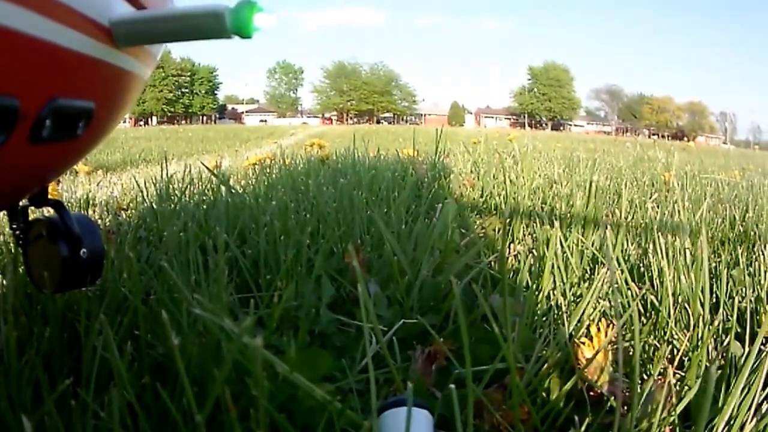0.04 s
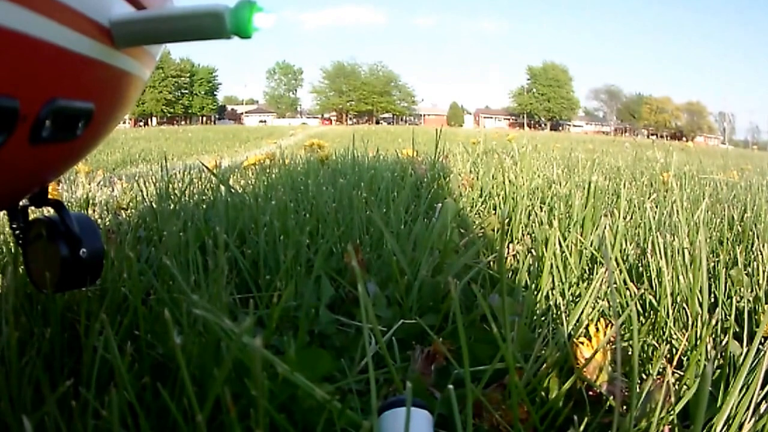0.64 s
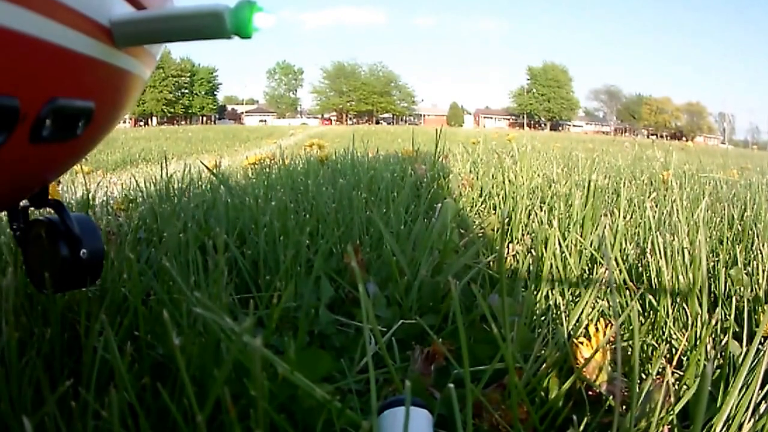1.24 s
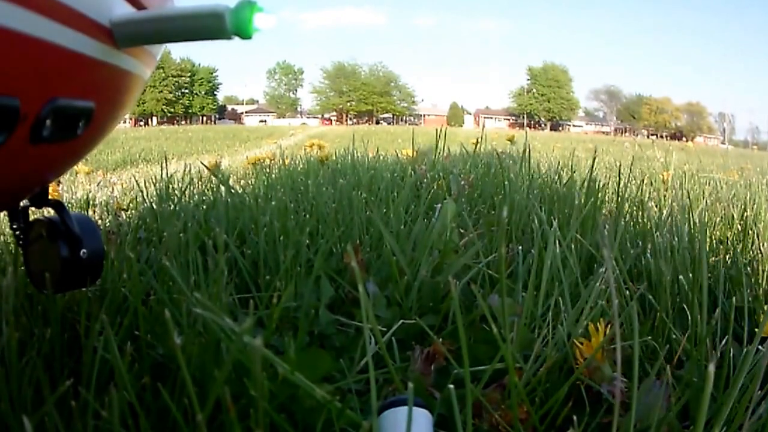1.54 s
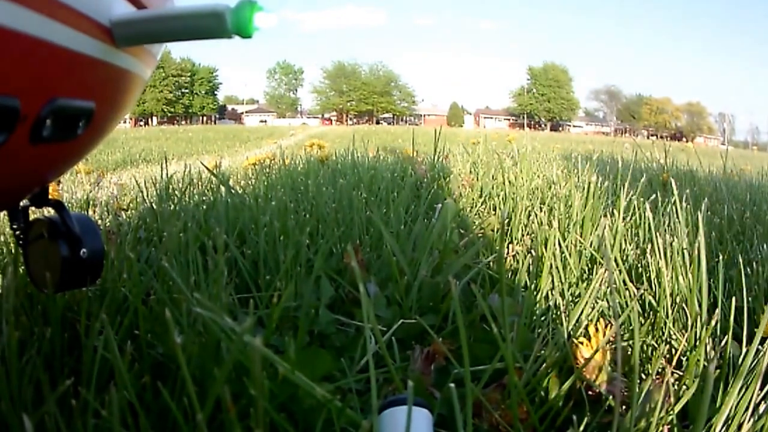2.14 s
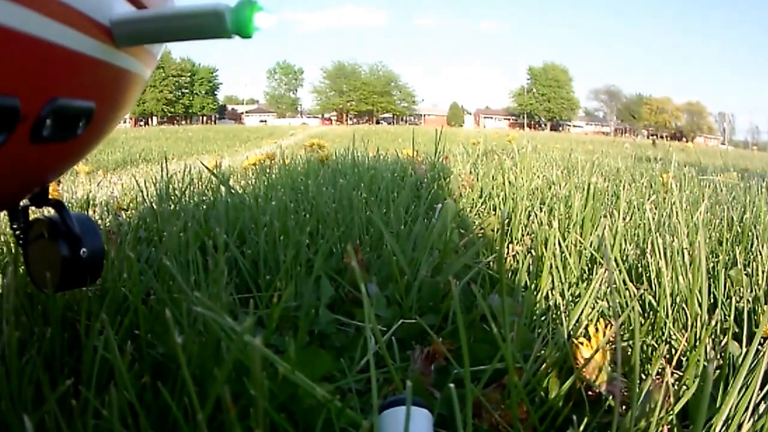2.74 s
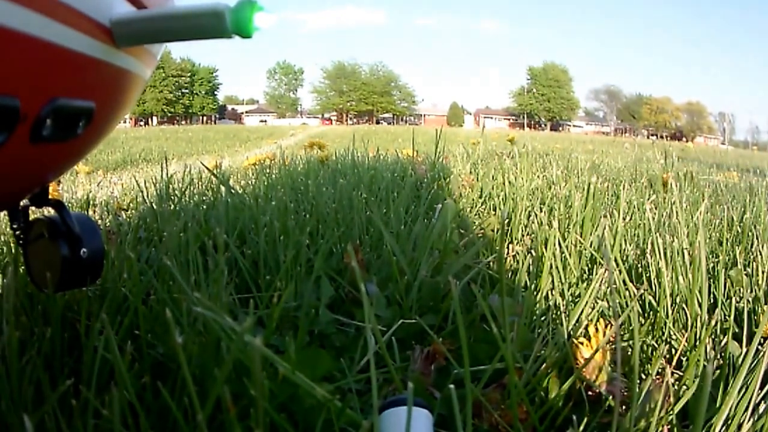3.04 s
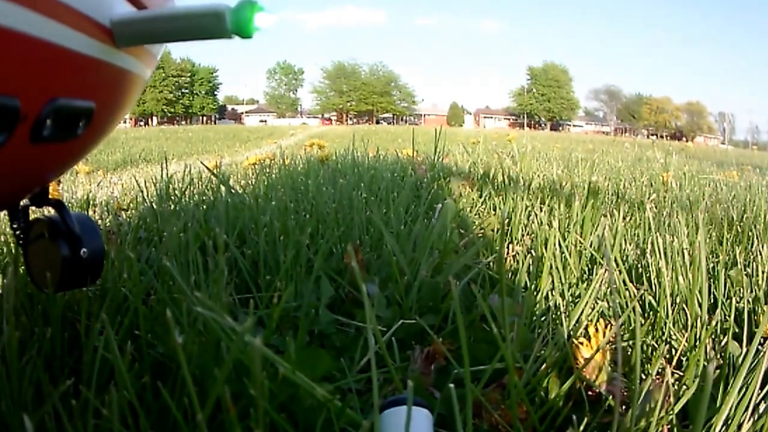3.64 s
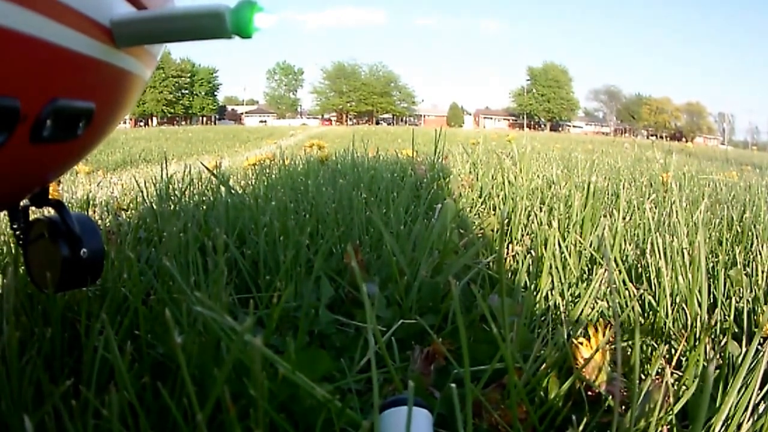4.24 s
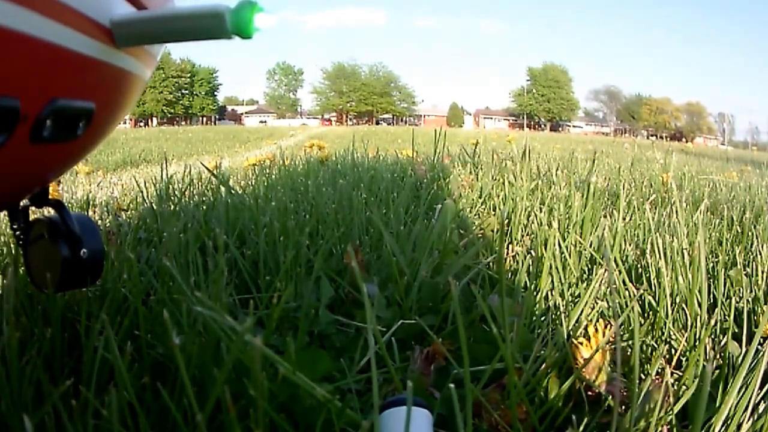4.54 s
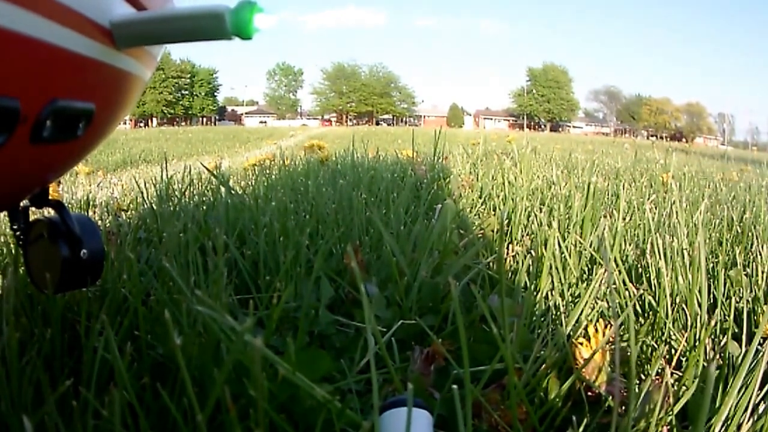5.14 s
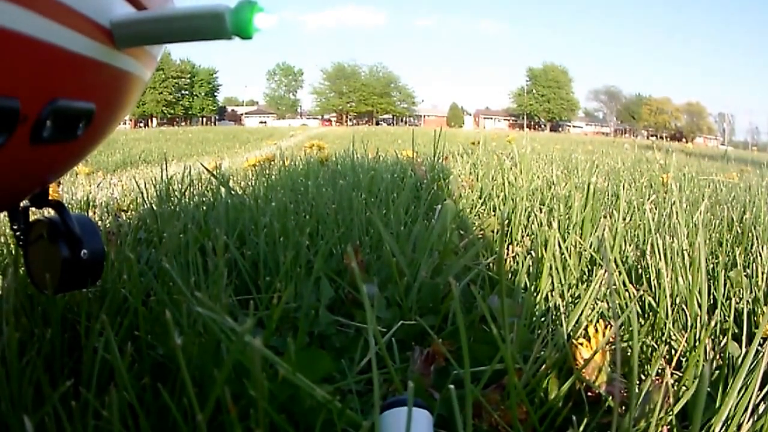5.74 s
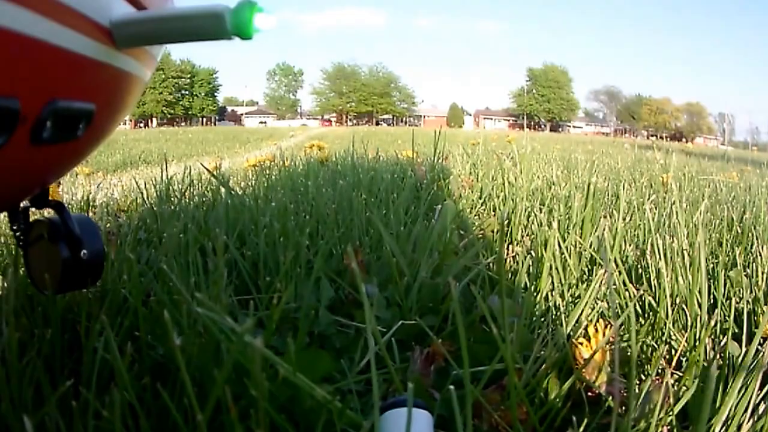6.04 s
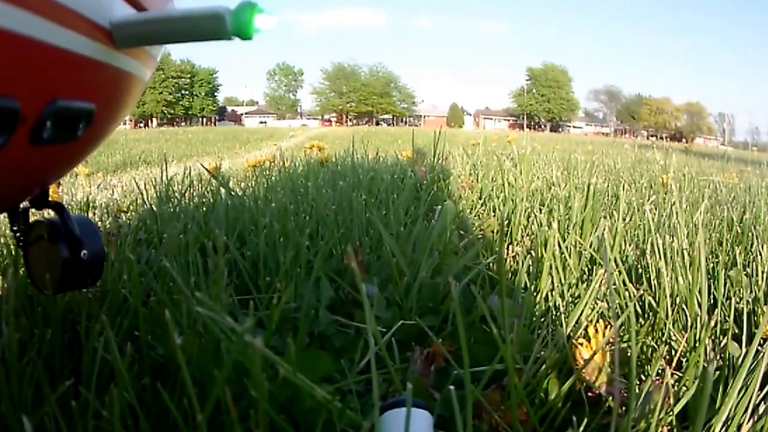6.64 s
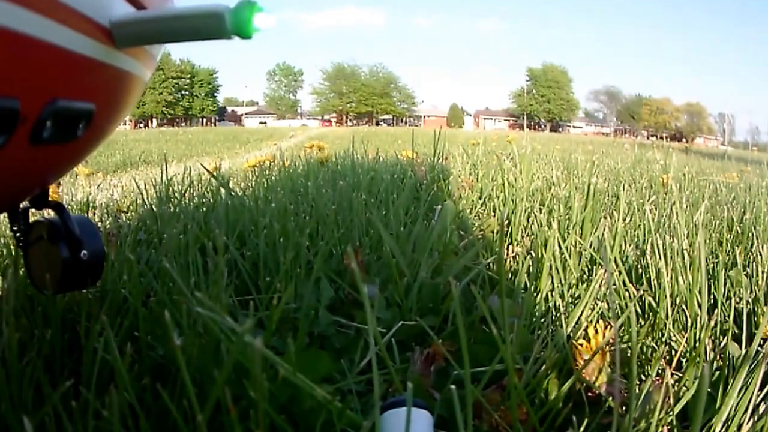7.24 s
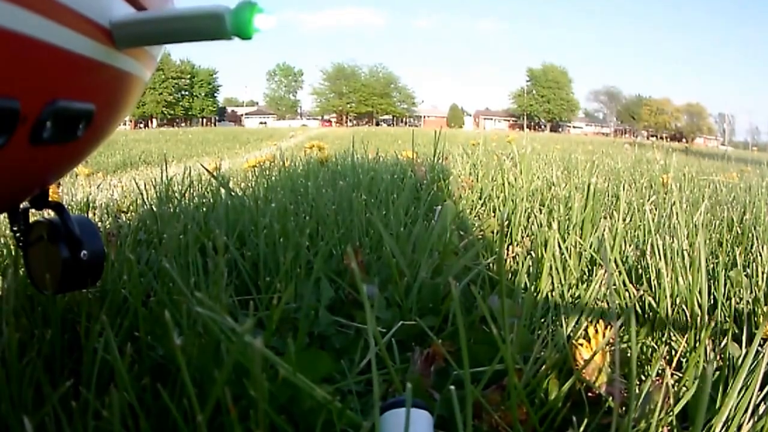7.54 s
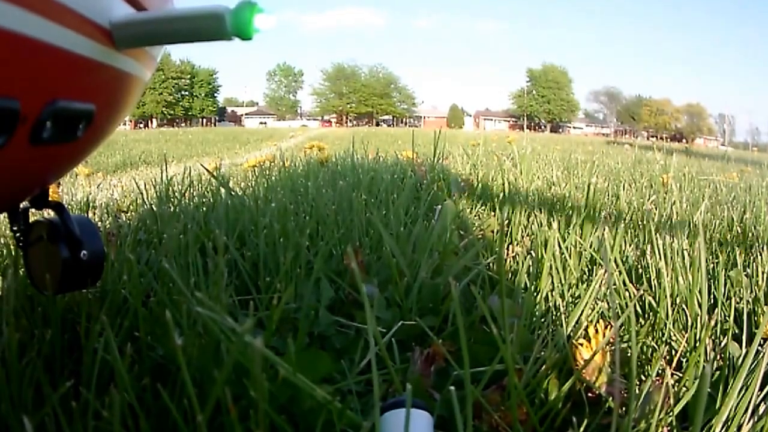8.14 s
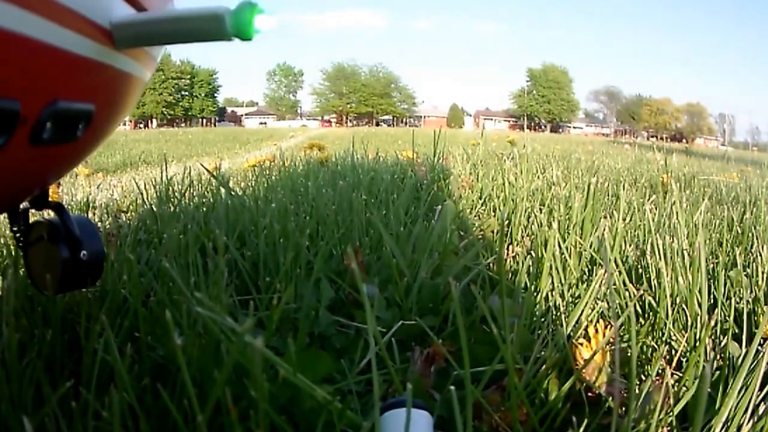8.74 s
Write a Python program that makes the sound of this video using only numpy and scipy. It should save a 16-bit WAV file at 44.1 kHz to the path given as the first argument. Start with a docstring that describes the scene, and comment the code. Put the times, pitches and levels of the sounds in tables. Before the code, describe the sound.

A model turbine helicopter winds down on the ground in an open field, heard from very close. A thin, high whine glides downward over a hissing jet, rushing exhaust and humming gears, with several brief dips early on. About halfway, a louder, piercing whistle breaks in and wavers as the engine settles to idle. The slowing blades give everything a fast flutter, and the exhaust swells again near the end.

```python
"""Model turbine helicopter winding down

A model helicopter stands in a grassy field while its engine slows to idle and its rotor coasts.
The compressor's whine glides down and echoes off the passing blades, the gears hum, the flame roars
and the jet hisses. The exhaust swells with the gas flow, and everything sags together in short lulls.
A small camera on the landing gear hears nothing above 9.6 kHz, so the whine's octave breaks in late."""
import sys
import numpy as np
from scipy.fft import rfft, irfft
from scipy.io import wavfile
from scipy.ndimage import uniform_filter1d

SR = 44100
rng = np.random.default_rng(int(sys.argv[2]) if len(sys.argv) > 2 else 0)


def master(y):
    """Save y as 16-bit WAV."""
    cut = np.clip(np.atleast_2d(y).T, -1, 1)
    pcm = np.round(cut * 32767)  # scale
    wavfile.write(sys.argv[1], SR, pcm.astype(np.int16))


N = 396900  # 9 seconds


def from_db(db):
    """Turn decibels into a gain to multiply by."""
    return 10 ** (np.asarray(db) / 20)


def rms_one(x):
    """Scale a signal to an average strength (rms) of 1."""
    return x / np.sqrt(np.mean(x ** 2) + 1e-20)


def in_time(rows):
    """Join (time, value) points with straight lines, giving one value per sample."""
    return np.interp(np.arange(N) / SR, *np.transpose(rows))


def angle(per_s):
    """The angle reached by something that makes this many turns a second."""
    return 2 * np.pi * np.cumsum(per_s) / SR


def tone(phase, level_db):
    """A pure tone at the given rms level."""
    return np.sqrt(2) * from_db(level_db) * np.sin(phase)


def drift(rate_hz):
    """A smooth random wobble of rms 1, mostly slower than the given rate."""
    hz = np.arange(N // 2 + 1) * SR / N
    return rms_one(irfft(rfft(rng.standard_normal(N)) / (1 + (hz / rate_hz) ** 2), N))


def turbulence(colour, flutter_db, flutter_hz):
    """Coloured noise of rms 1 whose strength flutters as swirls of gas pass."""
    hz, db = np.transpose(colour)
    bins = np.maximum(np.arange(N // 2 + 1) * SR / N, 1)
    gain = from_db(np.interp(np.log(bins), np.log(hz), db))
    noise = irfft(rfft(rng.standard_normal(N)) * gain, N)
    return rms_one(noise * from_db(flutter_db * drift(flutter_hz)))


def bump(middle_s, length_s, steepness=2.23):
    """A rounded bump in time: 1 at its middle, 0 far from it."""
    distance = np.abs(2 * (np.arange(N) / SR - middle_s) / length_s)
    return np.exp(-np.minimum(distance, 4) ** steepness)


def engine_state(speed, idle_hz=925, load_octaves=0.36):
    """How hard the engine works: gas flow in dB, load (near 0 at idle, 1 at most) and lulls in dB."""
    # strength of the gas flow: (time [s], level over quiet idle [dB])
    flow = [(0, 6.5), (.3, 6), (1.0, 9.5), (1.5, 7), (1.8, 6.5), (2.3, 2.5), (2.8, -1.7), (3.1, -1.5),
            (3.9, -2), (4.3, -0.5), (5.5, -1.5), (6.2, 1), (6.7, 6.5), (8.15, 6), (8.7, 1.5)]
    # the engine's sound sags briefly: (middle [s], length [s], depth [dB])
    lulls = [(0.474, 0.066, 6), (0.577, 0.078, 5.5), (0.662, 0.25, 8.5), (1.165, 0.16, 3),
             (1.357, 0.11, 7.5), (2.137, 0.38, 9), (2.412, 0.16, 3), (2.53, 0.35, 6.5), (3.103, 0.27, 1.5),
             (3.697, 0.47, 1.5), (7.08, 0.44, 4), (7.637, 0.27, 2.5)]
    load = np.tanh(np.log2(speed / idle_hz) / load_octaves)
    lull_db = sum(depth_db * bump(s, length) for s, length, depth_db in lulls)
    return in_time(flow), load, lull_db


def follow(state, idle_db, flow_share, load_db, lull_share):
    """The level in dB of a sound that follows the engine's flow and load and sinks in the lulls."""
    flow_db, load, lull_db = state
    return idle_db + flow_share * flow_db + load_db * load - lull_share * lull_db


def chopping(blade):
    """Each passing blade chops the sound below it twice; gives the rise and fall in dB."""
    # chop depth, greatest at quiet idle: (time [s], swing at the blade rate [dB])
    depth = [(0, .5), (1.03, .5), (1.15, 1.6), (1.3, .8), (1.6, .5), (3.0, .5), (3.25, 1.4), (4.5, 1.35),
             (5.2, 1.8), (5.6, .8), (6.5, .35), (8.0, .35), (9, .7)]
    return in_time(depth) * (.8 * np.cos(2 * blade) - np.cos(blade))


def gas_flow(state, blade):
    """The flame roars, the exhaust rushes, the jet hisses and rasps; all sputter and flare together."""
    # colours of the four noises: (frequency [Hz], relative level [dB])
    roar_colour = [(15, -79), (40, -64.5), (70, -23), (120, -18), (155, -19), (190, -4.5), (250, -4),
                   (290, -5.5), (380, -1.5), (500, 0.5), (570, -3), (680, -8), (1000, -12.5), (2000, -41)]
    rush_colour = [(400, -27), (750, -11.5), (1000, -10.5), (1250, -3), (1570, -0.9), (1900, -3.5),
                   (2200, -7), (2600, -17), (4000, -23.5)]
    hiss_colour = [(1500, -25), (2500, -11), (3030, -3.5), (3350, -6), (4150, -2.5), (4450, -3.5),
                   (5150, -0.5), (5400, -1), (5730, -0.5), (6250, -1), (6680, 0.5), (7130, -0.4),
                   (7450, 0.5), (7750, 0), (8430, 3), (8950, 0.5), (9550, 5), (9900, -23.5)]
    rasp_colour = [(1700, -22.5), (2400, 0), (2900, -3.5), (3800, -1.5), (4800, -3.5), (6500, -16.5)]
    # the flame flares for an instant: (middle [s], length [s], rise [dB])
    flares = [(0.288, 0.083, 4.5), (0.526, 0.022, 4), (0.745, 0.045, 4.5), (1.055, 0.096, 0.5),
              (1.266, 0.042, 2), (1.793, .1, 0.5), (2.306, 0.024, 6.5), (2.784, 0.067, 5), (2.89, 0.083, 2),
              (3.316, .2, 1), (5.967, 0.15, 2), (7.35, 0.24, 1), (8.307, 0.3, 0.5)]
    sputter, chop_db = drift(58), chopping(blade)
    flare_db = sum(rise_db * bump(s, length) for s, length, rise_db in flares)
    flare_db += 0.5 * drift(12)  # the flame also flickers gently all the time
    roar_db = follow(state, idle_db=-38.5, flow_share=.5, load_db=7, lull_share=0.97)
    rush_db = follow(state, idle_db=-36.5, flow_share=1, load_db=-2, lull_share=1.05)
    hiss_db = follow(state, idle_db=-28.5, flow_share=0.9477, load_db=-5.5, lull_share=0.93)
    rasp_db = follow(state, idle_db=-52.5, flow_share=0, load_db=18.5, lull_share=1.3)
    roar = from_db(roar_db + 0.96 * sputter) * turbulence(roar_colour, flutter_db=0.7, flutter_hz=5.7)
    rush = from_db(rush_db + 0.98 * sputter) * turbulence(rush_colour, flutter_db=0.97, flutter_hz=250)
    hiss = from_db(hiss_db) * turbulence(hiss_colour, flutter_db=0.71, flutter_hz=70)
    rasp = from_db(rasp_db) * turbulence(rasp_colour, flutter_db=0.5, flutter_hz=86)
    jet_swing_db = 0.25 * sputter + .65 * chop_db + 0.34 * flare_db
    return from_db(chop_db + flare_db) * (roar + rush) + from_db(jet_swing_db) * (hiss + rasp)


def compressor(state, shaft, speed, blade, vanes=5, echo_delay_s=.00296):
    """Spinning vanes whine; their tone and its octave beat against echoes off the moving blades."""
    # the whine swells and fades as it glides: (time [s], level [dB])
    whine = [(0, -30.5), (.65, -32), (.88, -30.5), (1.1, -39.5), (1.27, -31.5), (1.52, -32.5),
             (1.68, -39.5), (1.85, -33), (2.25, -31.5), (2.45, -40), (2.85, -31.5), (3.1, -35), (3.42, -31),
             (3.85, -35), (4.05, -32), (4.4, -38), (5.17, -32), (5.75, -38), (6.05, -43), (6.8, -40),
             (7.4, -42), (9, -42.5)]
    # its octave, from main and splitter vanes together: (time [s], level [dB])
    octave = [(4.232, -41), (4.25, -15), (4.33, -14.5), (4.4, -19), (5.55, -20.5), (5.62, -15.5),
              (6.05, -15), (6.6, -20), (7.0, -18), (7.42, -19), (7.58, -16), (7.8, -19.5), (8.7, -17)]
    # the octave cuts out for an instant: (time [s], depth [dB])
    dropouts = [(4.355, 18), (4.445, 12), (4.515, 20), (4.585, 31), (5.575, 10)]
    _, _, lull_db = state
    whine_db = in_time(whine) - 1.25 * lull_db
    octave_db = in_time(octave) - sum(depth_db * bump(s, length_s=0.022) for s, depth_db in dropouts)
    # one echo comes from the blade's root and one from its tip; each pass sweeps their delays
    root_db = follow(state, idle_db=-17.5, flow_share=1.95, load_db=-12, lull_share=1.7)
    root_db = np.maximum(root_db, -15)
    sweep = np.sin(blade + 0.16 * drift(19))
    root_lag = 2 * np.pi * (speed * echo_delay_s - .024 * sweep)
    tip_lag = 2 * np.pi * (speed * echo_delay_s - .058 * sweep)
    tip_gain = from_db(-17 + 2.4 * drift(30)) * (1 + 0.87 * np.cos(blade))  # strongest as the tip nears
    out = 0
    for multiple, level_db in ((vanes, whine_db), (2 * vanes, octave_db)):
        root_echo = from_db(root_db + drift(20)) * np.exp(-1j * multiple * root_lag)
        tip_echo = tip_gain * np.exp(-1j * multiple * tip_lag)
        paths = 1 + root_echo + tip_echo  # the 1 is the direct sound
        beating = np.abs(paths) / np.sqrt(uniform_filter1d(np.abs(paths) ** 2, size=SR // 10))
        out += beating * tone(multiple * shaft + np.angle(paths), level_db + 0.86 * drift(31))
    return out


def gears(state, shaft, speed_ratio, blade, blade_count=3, play_rad=.08):
    """The gears hum and the unbalanced shaft shakes the bearings; looseness makes the tones waver."""
    # hum of the pinion, the small driving gear: (time [s], level [dB])
    hum = [(0, -23), (.31, -23), (.55, -36.5), (.8, -34), (.89, -24.5), (1.25, -23.5), (1.55, -27.5),
           (2.05, -29.5), (2.8, -37), (3.45, -44.5), (3.9, -50.5), (4.45, -40.5), (5.0, -51), (5.4, -46),
           (6.1, -40.5), (6.7, -32), (7.4, -31.5), (8.2, -32), (9, -37)]
    # gear overtones, which come out as the load falls: (time [s], level [dB])
    overtones = [(0, -58), (1.05, -37), (1.4, -40), (1.77, -31), (2.45, -39.5), (3.35, -35.5), (3.8, -35.5),
                 (4.35, -33), (5.7, -36.5), (6.65, -29.5), (7.3, -30.5), (8.1, -29.5), (8.7, -37.5)]
    # their pitches: (multiple of pinion speed, relative level [dB], loss at full load [dB])
    gear_tones = [(1.68, -14.5, -6), (2, 0, 0), (3, -11.8, 9), (3.36, -19, 8), (4, -15.5, 14)]
    # tone of the unbalanced shaft: (time [s], relative level [dB])
    unbalance = [(0, -60), (.3, -44), (.85, -33), (1.08, -48), (1.25, -37), (1.45, -41), (1.65, -34),
                 (2.1, -45), (2.5, -46), (2.85, -42), (3.6, -51), (4.2, -41.5), (4.55, -44), (5.2, -62),
                 (5.8, -46), (6.4, -39), (7.9, -36.5), (9, -42.5)]
    # buzz of the bearings, loudest in the surges: (time [s], level [dB])
    bearings = [(0, -59), (1.1, -46), (1.6, -50), (2.2, -55), (2.85, -46), (3.7, -51), (4.25, -44.5),
                (5.2, -52), (6.3, -39), (7.9, -36.5), (9, -46)]
    # its pitches: (multiple of pinion speed, relative level [dB])
    bearing_tones = [(.84, -7.5), (1.73, -6), (2.23, 2), (2.52, -4), (5.15, -15), (5.46, -14)]
    # throb of the slow end of the drive under load: (time [s], level [dB])
    throb = [(0, -58), (.35, -48), (.95, -43.5), (1.35, -57), (1.6, -55), (1.85, -51), (2.2, -74)]
    _, load, lull_db = state
    hum_db, overtones_db, unbalance_db, bearing_db, throb_db = (
        in_time(curve) - 0.93 * lull_db for curve in (hum, overtones, unbalance, bearings, throb))
    pinion = shaft / speed_ratio
    hum_jitter = (.14 + .22 * load) * drift(26)
    sway_db = np.cos(blade / blade_count)  # once per rotor turn
    out = tone(pinion + hum_jitter, hum_db + 1.3 * drift(28) + sway_db)
    shaft_jitter = (.3 + load ** 2) * drift(35)
    out += tone(shaft + shaft_jitter, unbalance_db - .6 + 2.24 * drift(25))
    tones = [(multiple, overtones_db + db - loss_db * load) for multiple, db, loss_db in gear_tones]
    tones += [(multiple, bearing_db + db) for multiple, db in bearing_tones]
    for multiple, level_db in tones:
        out += tone(multiple * (pinion + play_rad * drift(8)), level_db + 1.8 * drift(30))
    throbbing = np.arange(N) / SR < throb[-1][0]
    throb_fade = uniform_filter1d(throbbing.astype(float), SR // 4)
    return from_db(chopping(blade)) * out + throb_fade * tone(.23 * pinion, throb_db)


def hollow(exhaust, state, from_flow_db=-1.5, full_flow_db=-0.5):
    """The exhaust turns hollow and throaty as the load comes off, except at the weakest flow."""
    # humps and troughs of the hollow colour: (centre [Hz], width [Hz], gain [dB])
    humps = [(1290, 170, -1.5), (1570, 240, 2.9), (1990, 130, 2), (2370, 90, 5), (2470, 110, -6),
             (2690, 170, 4), (2790, 110, -10), (3280, 65, -9), (3820, 110, 2.5), (4570, 120, -4.5),
             (5600, 160, -0.5), (5720, 310, 3), (6240, 150, -7.5), (6550, 300, 2), (7860, 300, 1.5)]
    flow_db, load, _ = state
    hz = np.arange(N // 2 + 1) * SR / N
    colour_db = sum(db * np.exp(-(2 * (hz - centre) / width) ** 2) for centre, width, db in humps)
    throaty = irfft(rfft(exhaust) * from_db(colour_db), N)
    share = np.interp(flow_db, [from_flow_db, full_flow_db], [0, 1]) * (1 - load)
    return (1 - share) * exhaust + share * throaty


def rotor(state, blade):
    """The blades push air ahead of them, making a soft, low drone."""
    # strength of the drone: (time [s], level [dB])
    drone = [(2.0, -65.5), (3.3, -61.5), (4.5, -59.5), (5.4, -68), (6.15, -58), (6.6, -45), (7.4, -46.5),
             (9.0, -63.5)]
    # its pitches: (multiple of the blade rate, relative level [dB])
    blade_tones = [(2, 0.5), (3, -12.5), (4, -12.5)]
    _, _, lull_db = state
    level_db = in_time(drone) - .8 * lull_db
    return sum(tone(multiple * blade, level_db + db + 1.2 * drift(6)) for multiple, db in blade_tones)


def tailpipe(state, blade, pitch_hz=1651, width_hz=300, wander_hz=59.9):
    """Swirling gas rings in the tailpipe: a band of noise whose pitch wanders with the gas's heat."""
    ringing = angle(pitch_hz + wander_hz * drift(5))
    noise = drift(width_hz) * np.cos(ringing) + drift(width_hz) * np.sin(ringing)
    level_db = follow(state, idle_db=-46, flow_share=1.58, load_db=-16.5, lull_share=0.6)
    return from_db(level_db + chopping(blade) + 0.78 * drift(40)) * noise


def scene(inertia_s=.15, first_passes_per_s=58, rotor_halves_s=9.4):
    """Shaft speed, gas flow and rotor speed drive every sound."""
    # the turbine shaft runs down, then wanders around idle: (time [s], speed [turns per s])
    shaft_speed = [(0, 1677), (.5, 1543), (1.4, 1290), (2, 1156), (2.65, 1053), (3.05, 1021), (3.8, 986),
                   (4.03, 968.5), (4.25, 957.5), (4.45, 958), (5.2, 971.5), (5.6, 956.5), (6.1, 942),
                   (7.12, 919), (7.56, 938.5), (8.3, 923), (9, 912.5)]
    speed = uniform_filter1d(in_time(shaft_speed), size=int(inertia_s * SR), mode="nearest")
    speed *= 1 + 0.00027 * drift(10.4)
    shaft = angle(speed)
    # air drag slows the rotor; this angle goes round once per passing blade
    blade = angle(first_passes_per_s / (1 + np.arange(N) / SR / rotor_halves_s))
    state = engine_state(speed)
    exhaust = hollow(gas_flow(state, blade) + tailpipe(state, blade), state)
    whine = compressor(state, shaft, speed, blade)
    hum = gears(state, shaft, speed_ratio=4.31, blade=blade)
    return (exhaust + whine + hum + rotor(state, blade))[None]


def record(dry, notch_hz=7965, notch_width_hz=227, cutoff_hz=9602):
    """The camera loses a narrow band near 8 kHz and cuts off the highest treble very steeply."""
    size = 2 * N
    hz = np.arange(N + 1) * SR / size
    away = ((hz - notch_hz) / notch_width_hz) ** 4
    notch = away / (1 + away)
    top_edge = (1 - np.tanh((hz - cutoff_hz) / 18)) / 2
    return irfft(rfft(dry, size) * notch * top_edge, size)[:, :N]


dry = scene()
out = record(dry)
master(out)
```